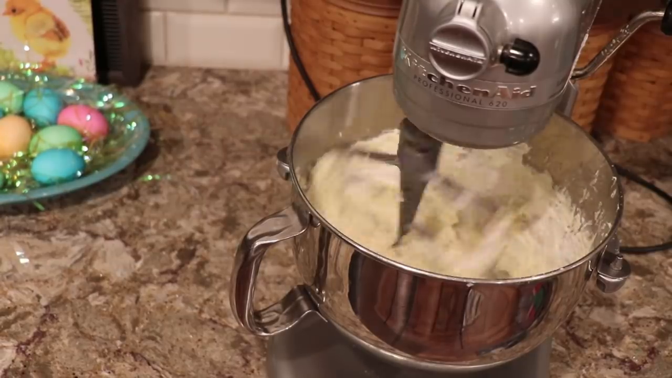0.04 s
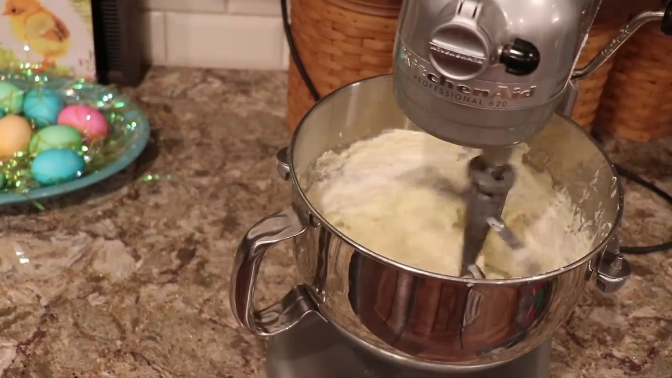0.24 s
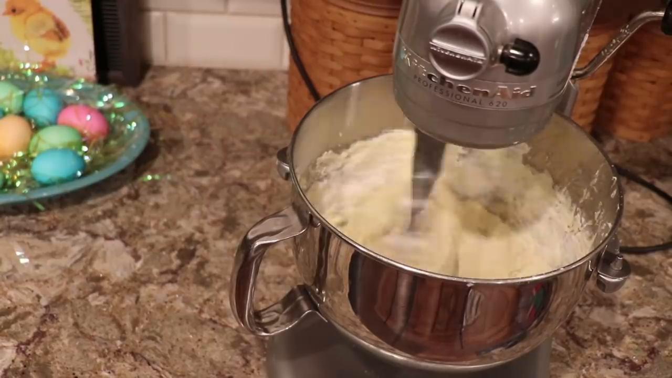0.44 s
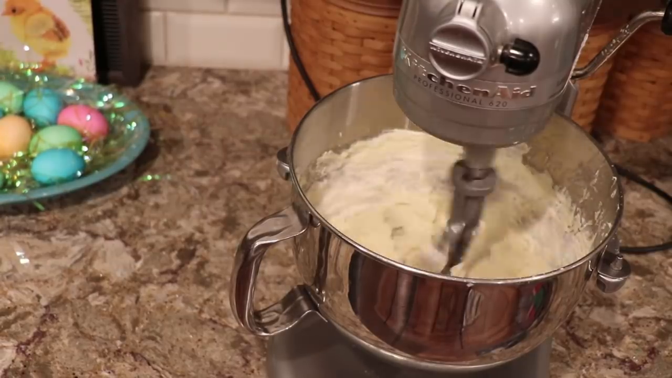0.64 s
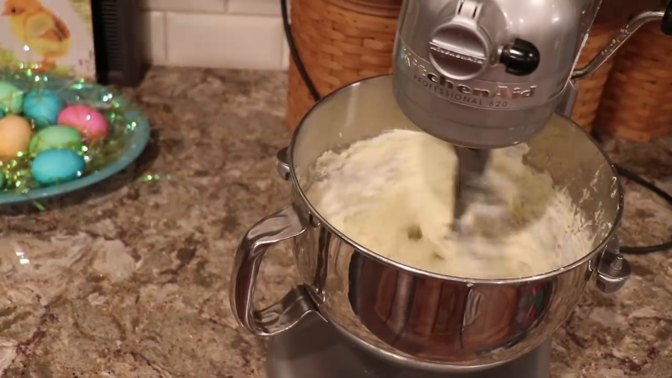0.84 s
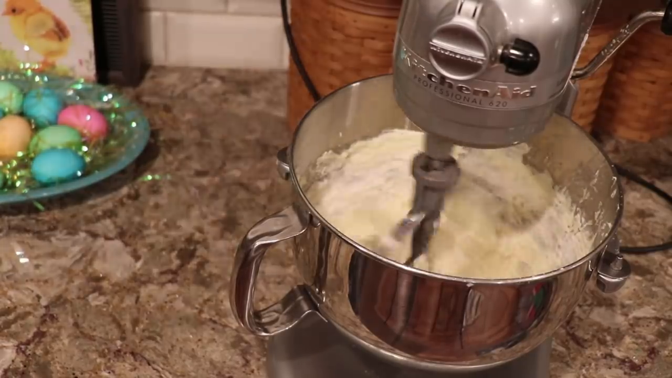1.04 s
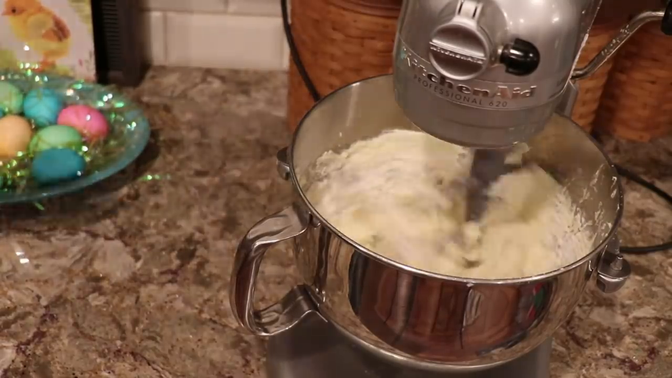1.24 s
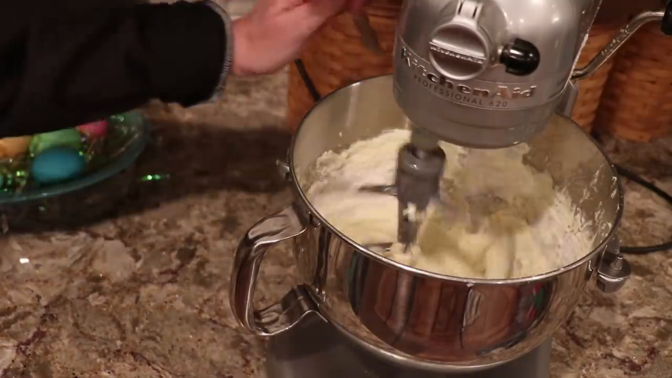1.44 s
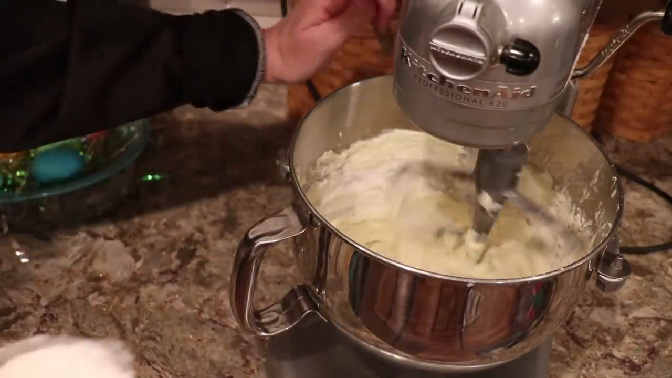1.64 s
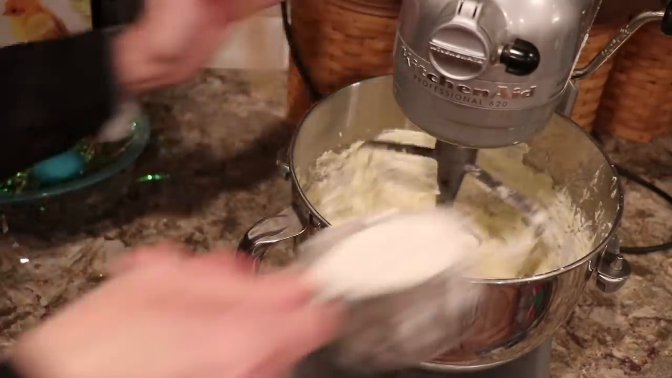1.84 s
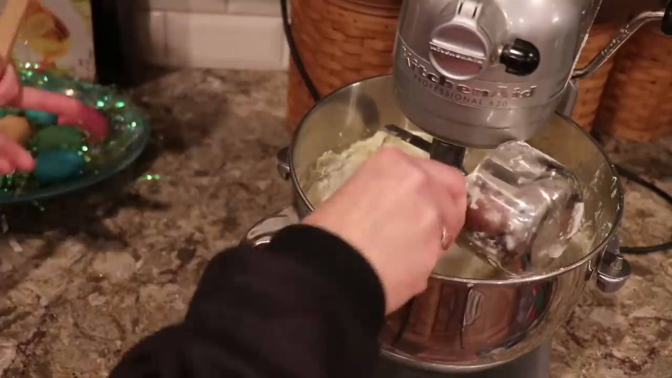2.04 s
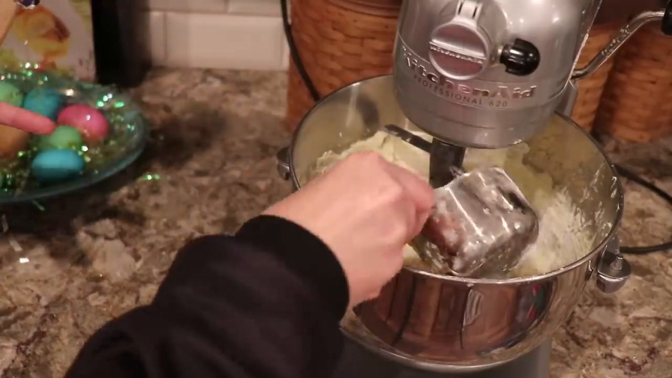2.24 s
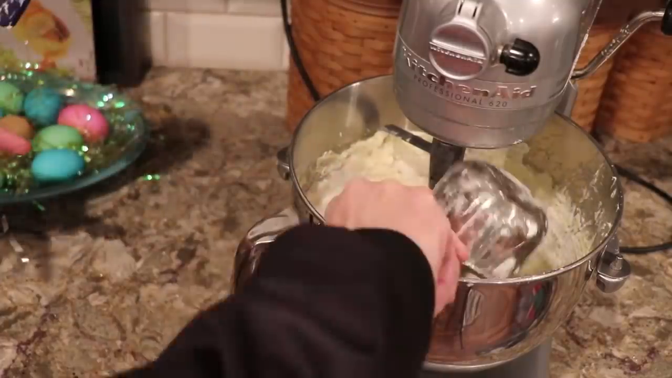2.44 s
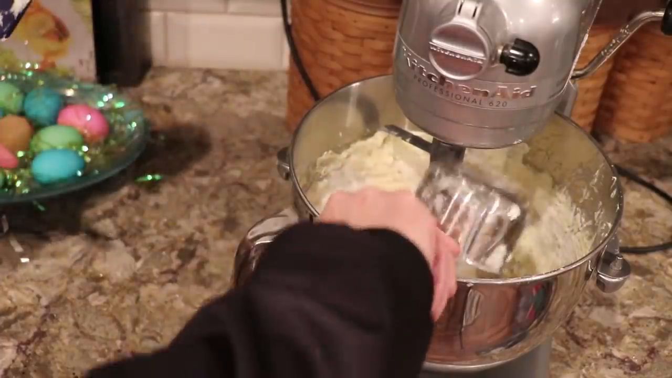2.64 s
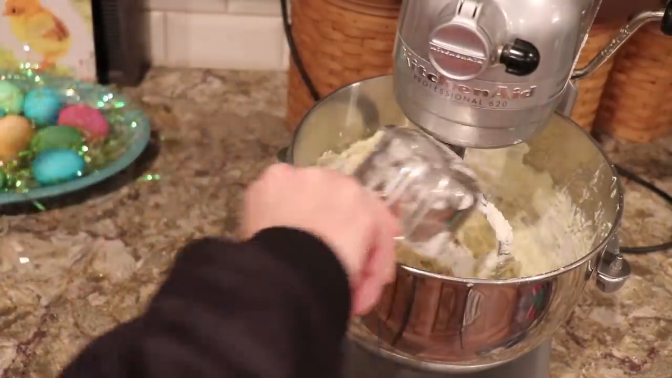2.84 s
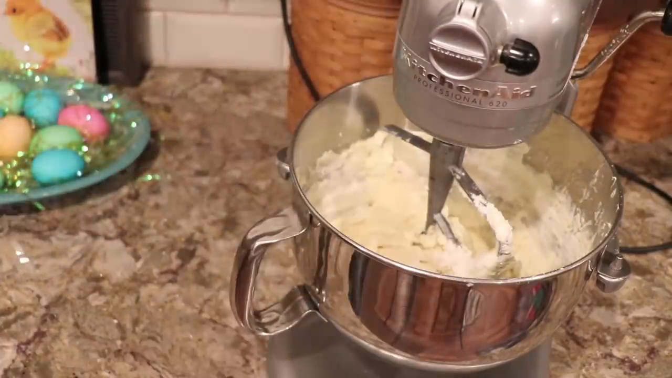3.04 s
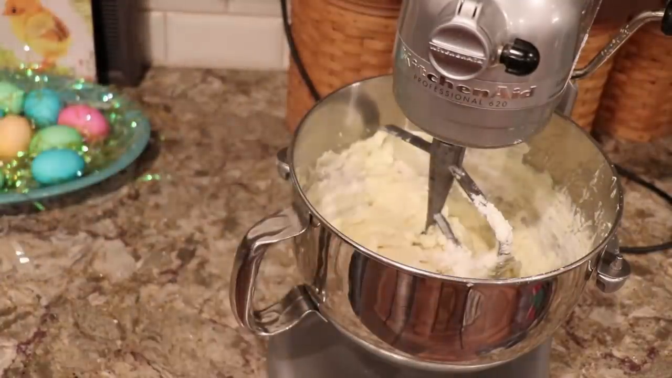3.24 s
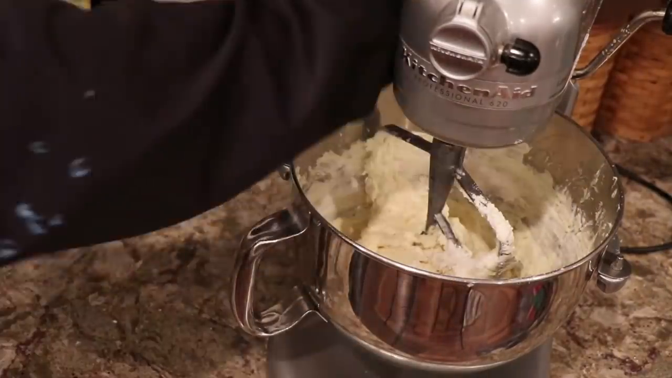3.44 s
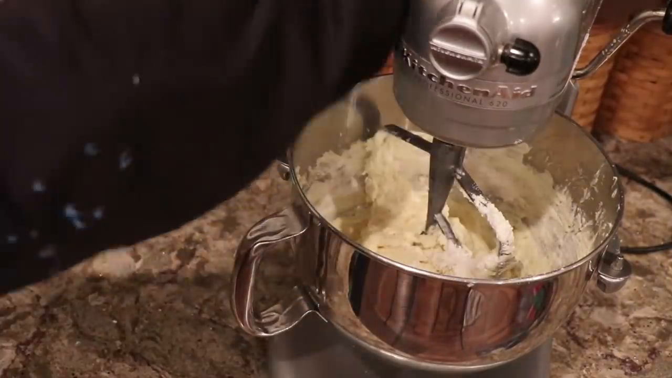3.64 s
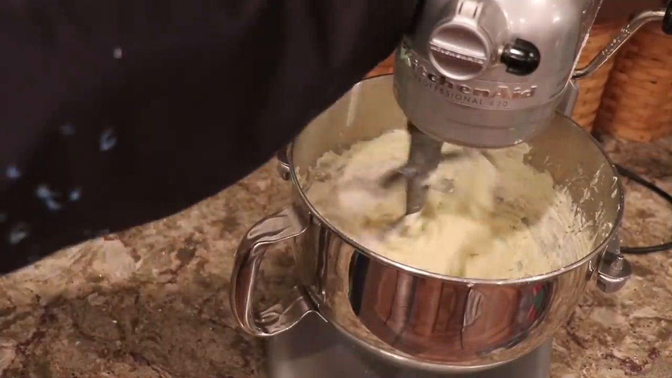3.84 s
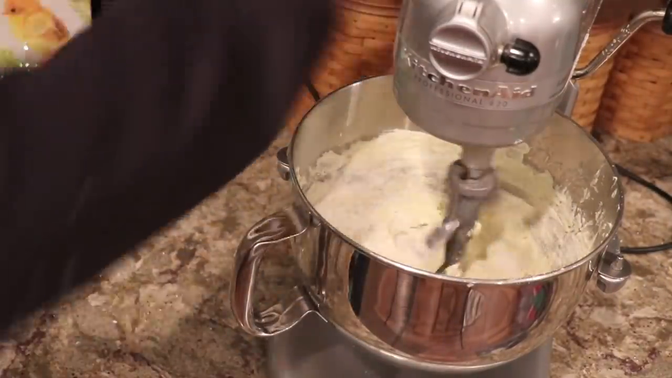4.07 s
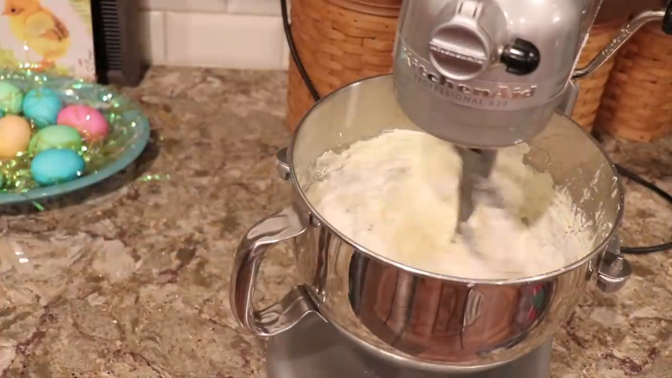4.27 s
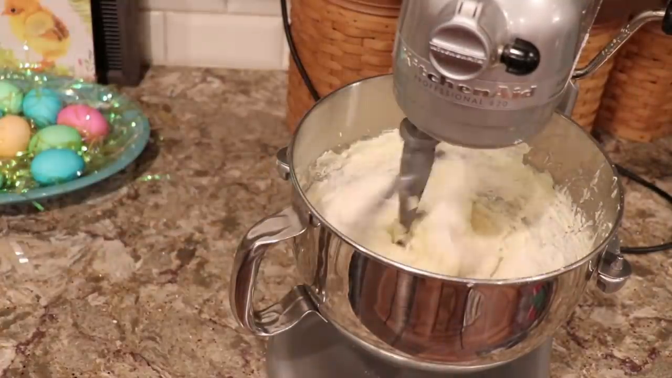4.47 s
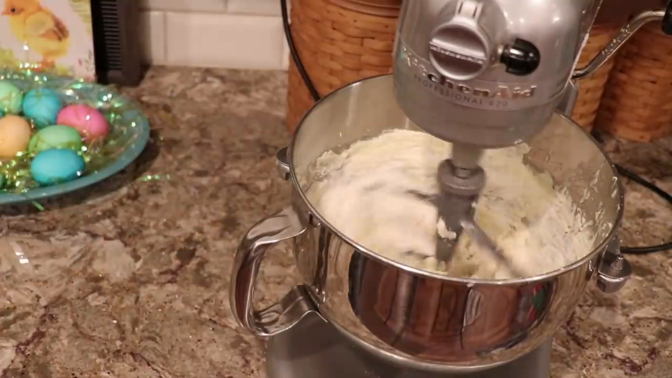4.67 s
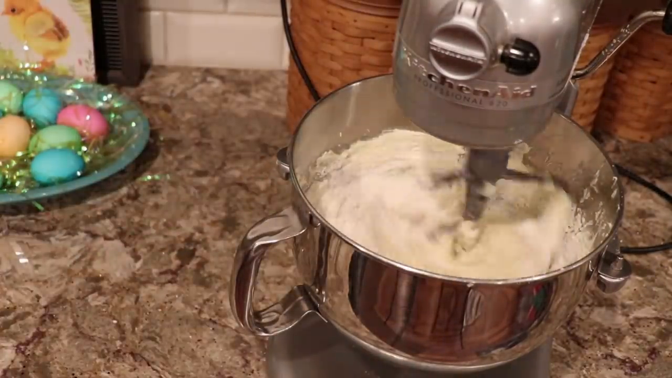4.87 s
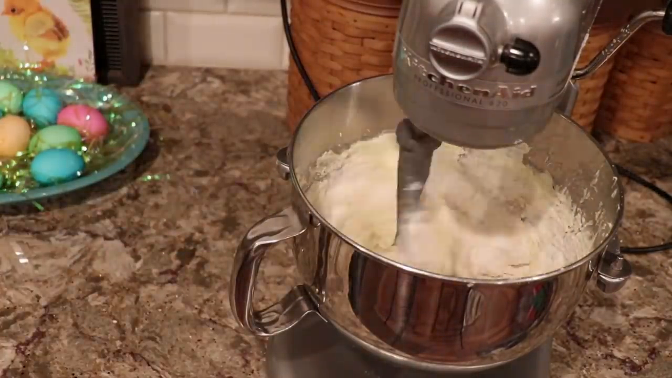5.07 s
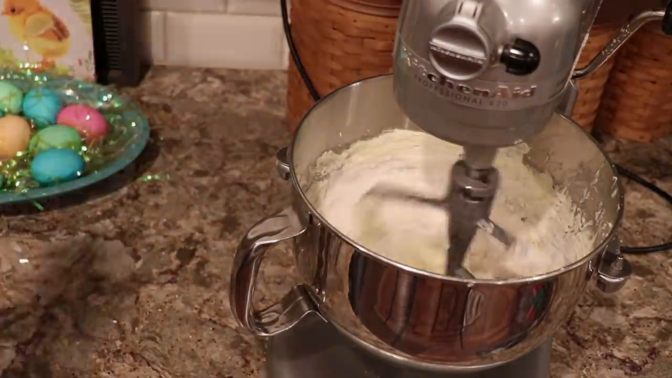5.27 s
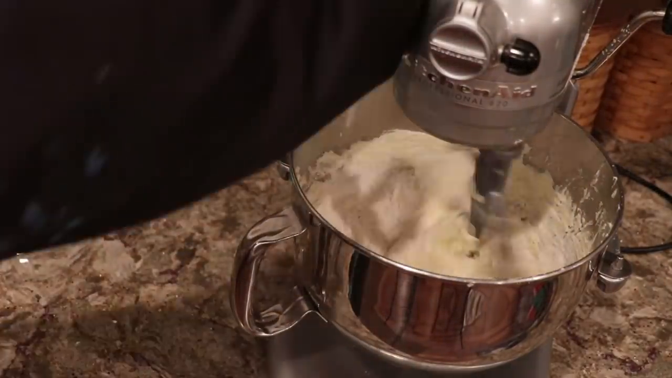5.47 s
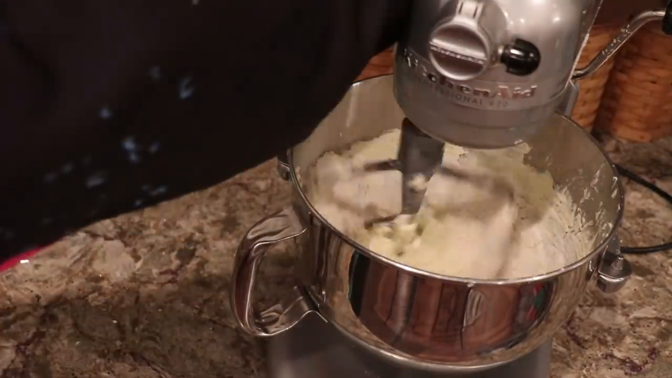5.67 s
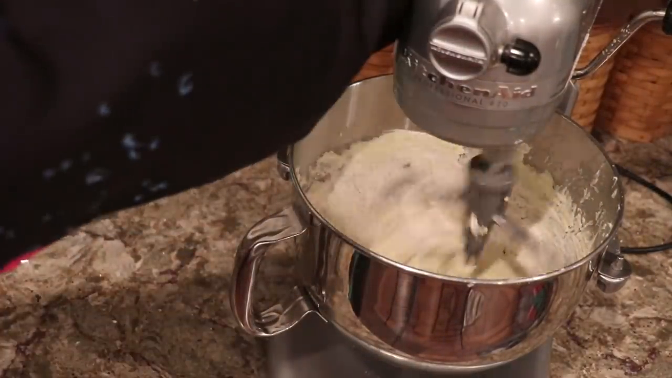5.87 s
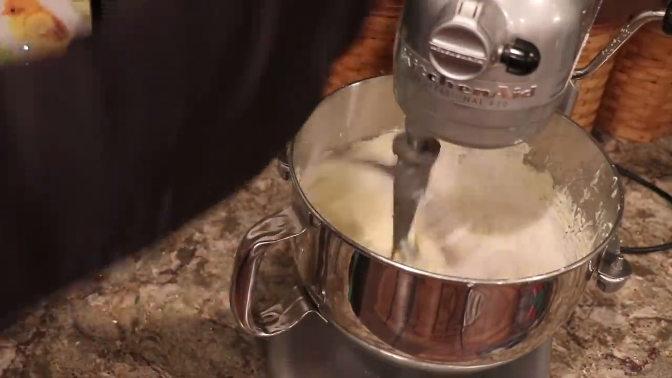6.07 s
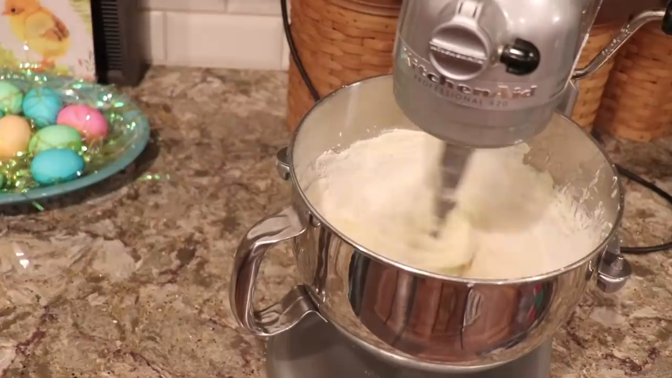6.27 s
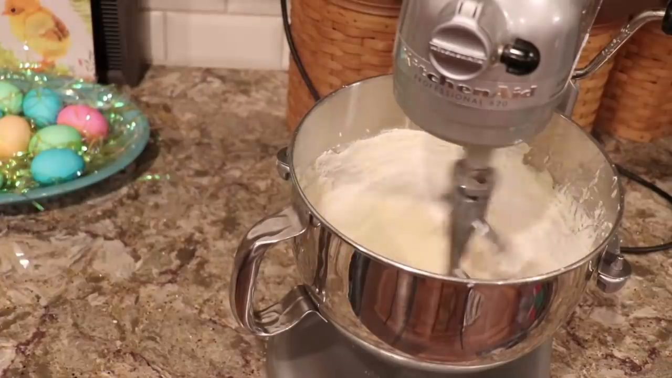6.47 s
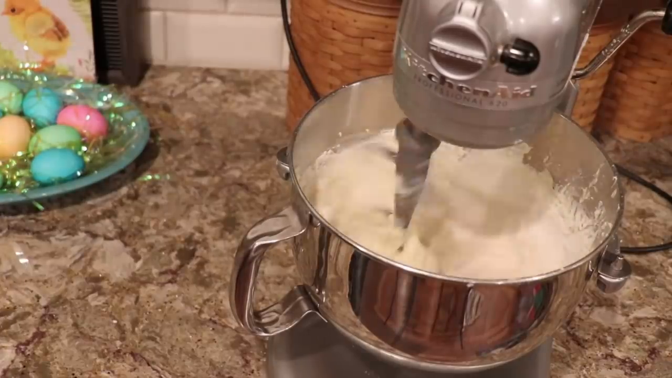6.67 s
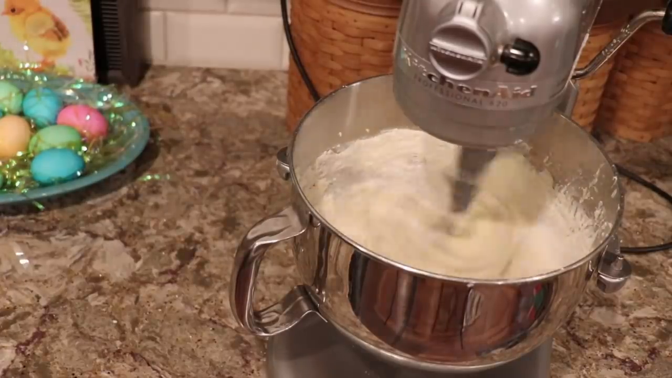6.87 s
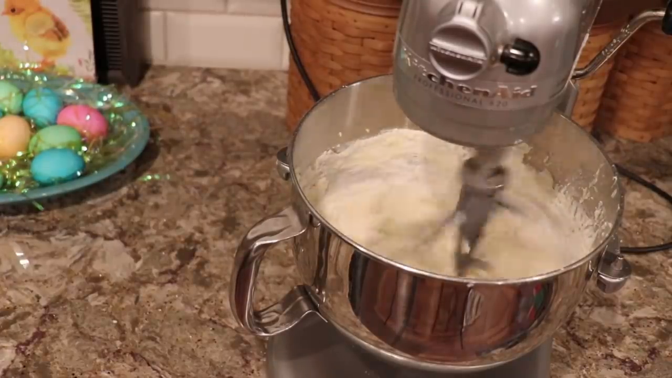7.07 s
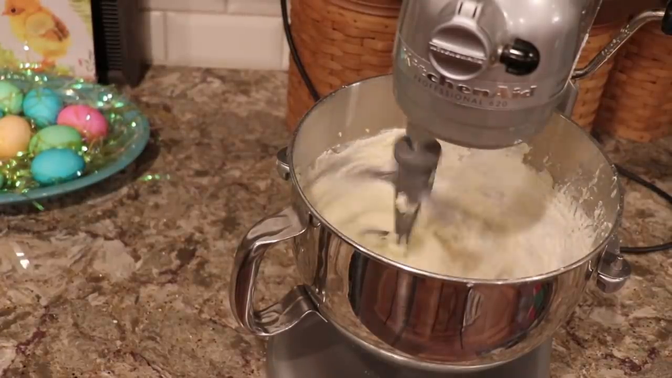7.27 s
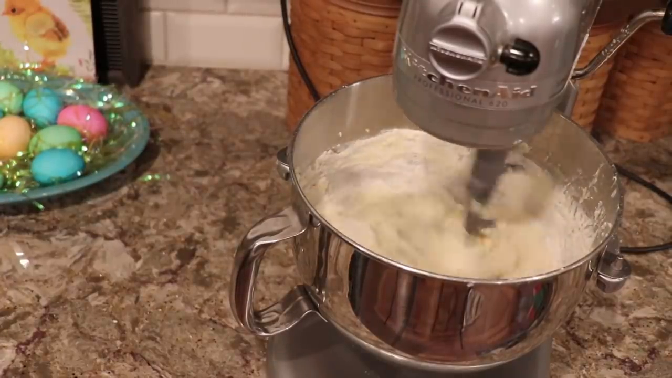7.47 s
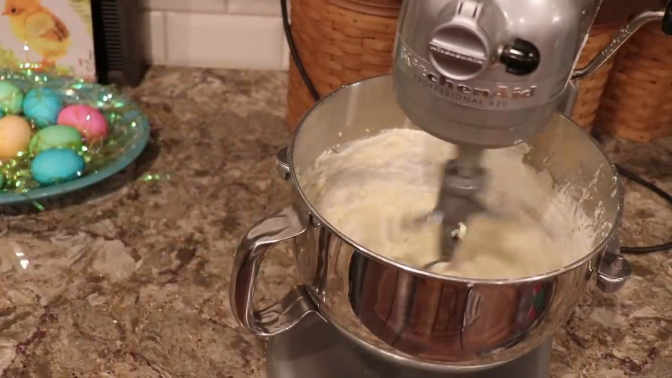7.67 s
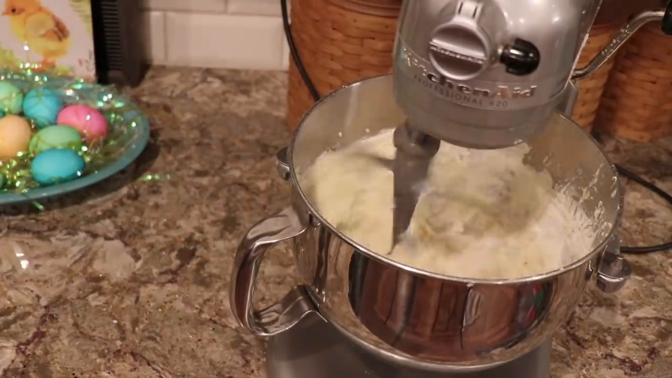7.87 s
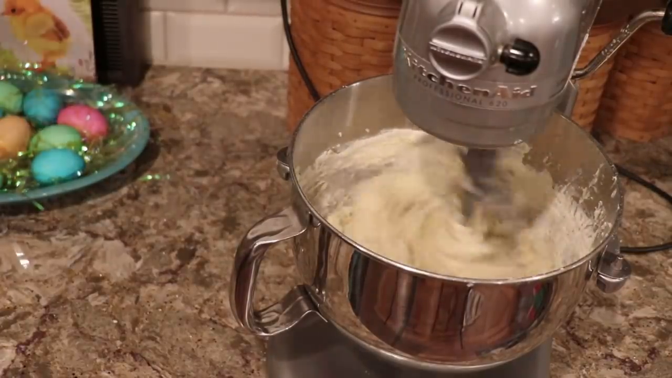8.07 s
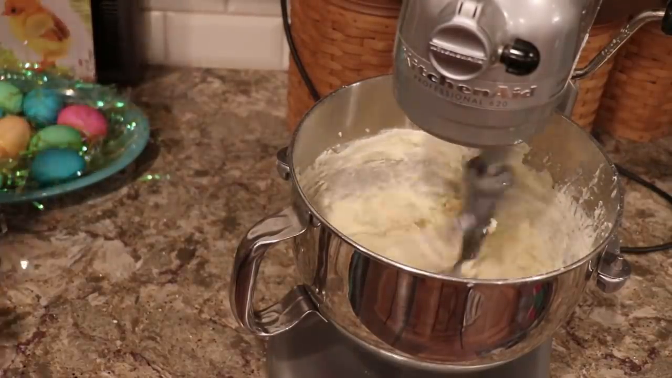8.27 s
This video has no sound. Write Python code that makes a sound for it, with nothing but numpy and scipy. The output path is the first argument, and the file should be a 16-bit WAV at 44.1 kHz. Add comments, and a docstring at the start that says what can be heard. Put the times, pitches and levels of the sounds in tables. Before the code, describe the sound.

From 0 to 1.7 seconds a stand mixer runs at medium speed, a steady nasal gear whine over grainy metallic housing rattle, throbbing rapidly with each turn. Switched off at 1.7, it slides down in pitch and dulls, stopping by about 2.0. Over faint hum and kitchen air, a metal cup knocks the steel bowl at 2.02, 2.08 and twice around 2.23, with soft scrapes, faint ticks near 2.55 and another bright tap at 2.83. At 3.28 the cup lands on the counter with a clack, low thud and short, thin high ring. Tiny switch-side ticks come at 3.56. At 3.77 the motor restarts with a gear jolt and strained buzz, settling into a lower, slower whine. At 5.82 it is turned up, leaping within about a tenth of a second with a clunk to a higher, brighter, busy whir that holds to 8.4. Close stereo, short room reflections.

```python
"""A stand mixer whirs at middle speed on a stone counter, is switched off and coasts down.
A metal cup knocks on the steel bowl and is set down; the mixer restarts slowly, then is turned up.
Gear teeth and motor poles sing at multiples of the shaft speed over noise from the rattling housing.
Blows are noise bursts passed through metal modes; thuds and slides are shaped bands of noise.
A controller buzz that rises and falls with effort, a faint hum, kitchen air and a short room join them."""
import sys
import numpy as np
from scipy import signal
from scipy.fft import rfft, irfft, next_fast_len
from scipy.io import wavfile
from scipy.ndimage import uniform_filter1d

SR = 44100
rng = np.random.default_rng(int(sys.argv[2]) if len(sys.argv) > 2 else 0)


def convert_level_to_amplitude(level_db):
    """Map a level in decibels to its linear amplitude factor."""
    exponent = np.asarray(level_db, float) / 20
    return 10 ** exponent


def dump(signal):
    """Clip the signal to [-1, 1] and save it as 16-bit WAV at the path in sys.argv[1]."""
    limited = np.clip(np.atleast_2d(signal).T, -1, 1)
    pcm = np.round(limited * 32767).astype(np.int16)
    wavfile.write(sys.argv[1], SR, pcm)


N = 366458
TIME = np.arange(N) / SR  # seconds


def evened(x):
    """Normalisation: scales a signal to unit rms."""
    return x / np.sqrt(np.mean(abs(x) ** 2) + 1e-20)


def read(points, hz):
    """Interpolation on a logarithmic frequency axis."""
    table_hz, value = np.transpose(points)
    return np.interp(np.log(hz + 1), np.log(table_hz + 1), value)


def coloured(x, db_of):
    """Zero-phase filtering: weights the spectrum by a level in dB given as a function of frequency."""
    length = x.shape[-1]
    size = next_fast_len(length)
    gain = convert_level_to_amplitude(db_of(np.fft.rfftfreq(size, 1 / SR)))
    return irfft(rfft(x, size) * gain, size)[..., :length]


def drift(width_hz):
    """Narrow-band random modulation: complex noise of unit rms through two equal low-pass poles."""
    hop = 64  # samples between computed points
    steps = np.arange(N // hop + 2)
    noise = rng.standard_normal((len(steps), 2)) @ [1, 1j]
    pole = np.exp(-np.pi * width_hz * hop / SR)
    wander = signal.lfilter([1], np.convolve([1, -pole], [1, -pole]), noise)
    return np.interp(np.arange(N) / hop, steps, evened(wander))


def add(mix, start_s, sound):
    """Superposition: adds a sound to the mix from its starting time."""
    part = mix[round(start_s * SR):][:len(sound)]
    part += sound[:len(part)]


# Shaft speed at the low, middle and high setting [turns per second].
SHAFT_SPEEDS = [15.94, 21.63, 32.03]
# Stages of the shaft speed: lever moves, then a last trim by the speed controller.
# Each row: start in seconds, speed asked for in turns per second (0 is off, and the shaft coasts),
# time constant of the approach in seconds.
SPEED_STAGES = [(1.69, 0, .335), (3.766, 15.96, .083), (5.82, 21.9, .013), (5.903, 31.4, .014),
                (5.95, 32.03, .045)]


def setting_of(speed):
    """Interpolation: places a shaft speed on the scale 0 low, 1 middle, 2 high."""
    return np.interp(speed, SHAFT_SPEEDS, [0, 1, 2])


def shaft():
    """Rotational inertia: the shaft lags each stage of the speed; gives speed and the speed asked for."""
    friction = 8  # dry friction drags the coasting shaft as if toward this many turns a second backwards
    asked = speed = np.full(N, SHAFT_SPEEDS[1])
    for start, turns, takes in SPEED_STAGES:
        since = np.maximum(TIME - start, 0) / takes
        left = np.exp(-since ** 2) if turns else np.exp(-since)
        goal = turns or -friction
        moved = np.maximum(goal + (speed[round(start * SR)] - goal) * left, 0)
        speed = np.where(TIME < start, speed, moved)
        asked = np.where(TIME < start, asked, turns)
    return speed, asked


# Base level of the rattle at the low, middle and high setting [dB, before a common 3.5 dB cut].
RATTLE_LEVELS = [-33.5, -31, -30]
# The main mesh is lost at slow speed. Each row: shaft speed in turns per second, level change in dB.
MESH_LEVELS = [(2, -70), (8, -44), (12.6, -29), (13.7, -0.5)]


def drive(speed, asked):
    """Load-dependent excitation: rattle, tone and mesh levels in dB, and the controller's effort."""
    coast_power = 1.37  # while coasting, rattle falls with this power of speed below the low setting
    slip_db, unload_db, fade_db_per_s = -60, -11, -130  # tones sink under lag and once power is cut
    backlash_db = 5.5  # unloaded teeth of the main mesh sing louder
    surge_db, surge_s = 15, 0.016  # tones flare on reaching top speed, then die by this time constant
    build_db, build_s = -1, 1  # at top speed the mixer starts softer and builds
    strain_per_lag, strain_s, eased = 6.8, 0.019, 0.54  # eased: effort at top speed

    powered = uniform_filter1d(1. * (asked > 0), size=400)
    lag = np.clip(1 - speed / np.maximum(asked, 1), 0, 1) * powered
    setting = setting_of(speed)
    since_off = TIME - SPEED_STAGES[0][0]
    top_start, _, top_takes = SPEED_STAGES[-2]
    since_top = TIME - top_start - 1.5 * top_takes
    flare, build = (uniform_filter1d((since_top > 0) * np.exp(-abs(since_top) / s), size=500)
                    for s in (surge_s, build_s))

    slow_db = 20 * np.log10(np.clip(speed / SHAFT_SPEEDS[0], .01, 1))
    rattle_db = np.interp(setting, [0, 1, 2], RATTLE_LEVELS) + (1 - powered) * coast_power * slow_db
    rattle_db = rattle_db + build_db * (build - flare)
    top_db = surge_db * flare + build_db * build
    cut_db = (1 - powered) * (unload_db + fade_db_per_s * since_off)
    tones_db = np.maximum(uniform_filter1d(slip_db * lag + cut_db, size=300), -50) + top_db
    mesh_db = np.interp(speed, *np.transpose(MESH_LEVELS)) + (1 - powered) * backlash_db + top_db

    pole = np.exp(-1 / (strain_s * SR))
    strain = np.minimum(strain_per_lag * signal.lfilter([1 - pole], [1, -pole], lag), 1)
    effort = powered * (np.interp(setting, [1, 2], [1, eased]) + strain)
    return rattle_db, tones_db, mesh_db, effort


# Multiples of the shaft speed that sing: gear meshes near 15 and 60, motor slots at 72 [orders].
SINGING_ORDERS = [24.7, 30.75, 40.1, 46.2, 50.85, 53, 60, 61.3, 66, 72, 75.3, 78, 84.6, 90.55, 105.4, 117.2,
                  121.3, 135.3, 144, 150.3, 166, 180.5, 204, 216, 237, 239, 287.5, 301, 360, 419.5, 431.5,
                  503.5, 576, 606, 650, 666, 720]
# Strength of each order above. Each row: rms level in dB at the low, middle and high setting before
# drive and throb, smeared share from 0 to 1.
ORDER_LEVELS = [(-75, -89, -58.5, 0.26), (-77, -62.5, -44, 0.04), (-67, -82, -58.5, 0.3),
                (-72, -48, -58.5, 0), (-66, -85, -68.5, 0.1), (-55, -72, -78, 0.03),
                (-40, -41.5, -39, 0.12), (-81, -71, -44.5, 0.9), (-78, -61, -83, 1),
                (-47.5, -65, -61, 0.24), (-78, -51, -40.5, 0.37), (-91, -52, -40, 0.7),
                (-92, -53, -58, 0.5), (-71, -62, -38.5, 0.19), (-58.5, -51, -44, 0.76),
                (-53, -46, -56, 0.2), (-52, -43.5, -53, 1), (-57.5, -50, -47, 0.65), (-83, -68, -55, 1),
                (-89, -62, -51.5, 1), (-86, -72, -65, 0.96), (-48, -55, -46, 0.4), (-72, -63, -72, 0.9),
                (-64, -55, -53.5, 0.87), (-58, -54, -90, 0.72), (-75, -51.5, -55.5, 0.65),
                (-75, -64, -50.5, 0.2), (-52.5, -51.5, -68, 0.92), (-53, -48, -56, 0.26),
                (-73, -53, -61, 0.6), (-79, -45.5, -59, 0.16), (-58, -52, -89, 0.4), (-58, -67, -80, 0),
                (-58, -61, -80, 0.2), (-55, -49, -78, 0.95), (-57.5, -51, -80, 0.1), (-60, -48, -90, 0.8)]


def gear_tones(setting, turn, wobble, tones_db, mesh_db):
    """Order tones: teeth and poles passing at fixed multiples of the shaft angle radiate lines."""
    mesh = 60  # teeth met per turn in the main mesh
    # the next gear turns a third as fast
    sway = np.interp(setting, [0, 1, 2], [.003, .003, .005]) * np.sin(turn / 3)
    tones = np.zeros(N)
    for order, (*levels, smeared) in zip(SINGING_ORDERS, ORDER_LEVELS):
        db = np.interp(setting, [0, 1, 2], levels) + (mesh_db if order == mesh else tones_db)
        if order == mesh:  # its teeth chatter at top speed
            smeared = np.interp(setting, [1, 2], [smeared, .7])
        # uneven teeth smear the line
        teeth = np.sqrt(1 - smeared) + np.sqrt(smeared) * drift(12 + 0.21 * order)
        angle = order * (turn + sway) + 2 * np.pi * rng.random()
        throb = 1 + wobble * np.clip(order / 30 - 1, .15, 1) * np.cos(turn)  # low orders hardly throb
        tones += np.sqrt(2) * convert_level_to_amplitude(db) * throb * (teeth * np.exp(1j * angle)).real
    return tones


# Relative rattle spectra, one list each for the low, middle and high setting.
# Each row: frequency in Hz, density in dB per Hz.
RATTLE_SPECTRA = [
    [(59, -78), (100, -42.5), (744, -19.5), (959, -3), (1180, -11.5), (1370, -19.5), (1890, -13),
     (2880, -6.5), (3200, -15.5), (5200, -16), (5900, -9.5), (6420, -14), (15600, -24)],
    [(59, -73), (100, -40), (542, -29), (590, -20), (1290, -4.5), (1530, -18), (2590, -4), (3550, -14.5),
     (7770, -12), (8630, -25), (9390, -14), (11600, -18), (15600, -27)],
    [(59, -63), (100, -35.5), (542, -28.5), (980, -12.5), (1370, -21.5), (1890, -5.5), (2880, -5.5),
     (3130, -6), (3340, -7.5), (5090, -12.5), (5900, -7.5), (8450, -18.5), (15600, -21.5)],
]
# Resonances of the cast housing. Each row: frequency in Hz, width in Hz, gain at the centre in dB
# before neighbouring resonances add.
HOUSING_MODES = [(804, 30, 6), (1020, 810, 5), (1277, 32, 7.5), (1670, 120, 9), (1850, 46, 8.5),
                 (1948, 83, 9), (2167, 100, 7), (2603, 170, 6.5), (2610, 56, 0.5), (2922, 61, 11),
                 (3360, 95, 12), (3713, 95, 9), (3936, 210, 10), (4337, 167, 11.5), (5440, 100, 2),
                 (5894, 206, 9.5), (7034, 37, 5.5), (8300, 110, 17), (9740, 470, 9), (10840, 750, 5),
                 (12350, 680, 10), (13620, 320, 17.5), (14960, 1230, 12), (16100, 300, -2)]


def housing_rattle(speed, setting, turn, wobble, rattle_db):
    """Forced vibration: irregular noise excites the resonant housing, heard from two of its faces."""
    shake = rng.standard_normal((2, N)) * convert_level_to_amplitude(1.38 * rng.exponential(1, N))
    shake *= 1 + 0.085 * wobble * np.cos(turn)
    shake *= 1 + 0.18 * np.cos(12 * turn)  # twelve poles
    shake *= convert_level_to_amplitude(0.64 * drift(3.4).real)

    def housing_db(hz):
        peaks = sum((convert_level_to_amplitude(db) - 1) / (1 + (2 * (hz - f) / width) ** 2) for f, width, db in HOUSING_MODES)
        return 20 * np.log10(1 + peaks.clip(-.9))

    shake = coloured(shake, housing_db)
    rattle = 0
    for k, points in enumerate(RATTLE_SPECTRA):
        share = np.sqrt(np.clip(1 - abs(setting - k), 0, 1))  # crossfade between settings
        rattle = rattle + share * evened(coloured(shake, lambda hz: read(points, hz)))
    slowing = np.clip(speed / SHAFT_SPEEDS[0], 0, 1)  # treble dies first as the shaft slows
    dull = coloured(rattle, lambda hz: -9.0 * np.log2(1 + hz / 1800))
    return convert_level_to_amplitude(rattle_db - 3.5) * (slowing ** 1.3 * rattle + (1 - slowing) * 3.1 * dull)


# Buzz of the speed controller. Each row: frequency in Hz, rms level in dB of the powered part at unit
# effort, rms level in dB of the part left at rest, power of the effort that the powered part follows.
BUZZ_LINES = [(360, -77.5, -86, 0.65), (502, -89, -76.5, 1.3), (510, -78, -97, 2.3), (600.4, -66, -64.5, 3),
              (900, -55.5, -62, 1.8), (1200, -50, -65.5, 0.3)]


def controller_buzz(effort):
    """Phase modulation: fixed-frequency lines grow with effort and roughen under strain."""
    roughness = 0.067 + 1.2 * np.clip(effort - 1.2, 0, 1)  # radians per unit of drift
    buzz = np.zeros(N)
    for hz, on_db, rest_db, power in BUZZ_LINES:
        level = convert_level_to_amplitude(rest_db) + effort ** power * convert_level_to_amplitude(on_db)
        buzz += level * np.sin(2 * np.pi * hz * TIME + roughness * drift(25).real)
    return np.sqrt(2) * buzz


def mixer():
    """Common excitation: one shaft drives tones, rattle and buzz; gives the near and far faces."""
    speed, asked = shaft()
    rattle_db, tones_db, mesh_db, effort = drive(speed, asked)
    turning = np.interp(TIME, [2.0, 2.01, 3.76, 3.766], [1, 0, 0, 1])  # silences tones and rattle at rest
    speed = speed * (1 + 0.001404 * drift(7.04).real)  # the dough loads the beater unevenly
    setting = setting_of(speed)
    turn = 2 * np.pi * np.cumsum(speed) / SR  # shaft angle in radians
    wobble = np.interp(setting, [0, 1, 2], [.25, .45, .4])  # an off-centre gear throbs once a turn
    tones = gear_tones(setting, turn, wobble, tones_db, mesh_db)
    near_face, far_face = turning * housing_rattle(speed, setting, turn, wobble, rattle_db)
    buzz = controller_buzz(np.maximum(effort, 0) * turning)
    return turning * tones + near_face + buzz, far_face


def hum():
    """Amplitude modulation: a steady 300 Hz sine whose rms level in dB comes and goes."""
    db = np.interp(TIME, [.35, .65, 5.67, 6.67], [-75, -70.5, -70.5, -93])
    return np.sqrt(2) * convert_level_to_amplitude(db) * np.sin(2 * np.pi * 300 * TIME)


# Relative spectrum of the kitchen air. Each row: frequency in Hz, density in dB per Hz.
KITCHEN_SPECTRUM = [(25, -50), (70, -24), (110, -16), (200, -27), (400, -10.5), (600, -5.5), (1000, 3.5),
                    (1400, -3.5), (2150, -7.5), (3000, -12.5), (6000, -23.5), (10000, -33.5), (12500, -30),
                    (15800, -33)]


def kitchen_air():
    """Coloured noise: two independent channels share a small flicker in level."""
    air = coloured(rng.standard_normal((2, N)), lambda hz: read(KITCHEN_SPECTRUM, hz))
    return convert_level_to_amplitude(-54) * evened(air) * convert_level_to_amplitude(drift(36).real)


# Reverberation of the room. Each row: frequency in Hz, 60 dB decay time in seconds.
ROOM_DECAY = [(300, 0.14), (1000, 0.17), (3000, 0.18), (8000, 0.11), (15000, 0.32)]


def room_tails():
    """Frequency-dependent reverberation: two tails of sparse random taps, bands dying at own rates."""
    taps = np.zeros((2, SR // 2))
    starts = np.arange(100, SR // 2 - 20, 20)
    at = starts + rng.integers(0, 20, (2, (SR // 2 - 101) // 20))
    np.put_along_axis(taps, at, rng.choice([-1., 1.], at.shape), 1)
    hz, t, spectrum = signal.stft(taps, SR, nperseg=256)
    decay = convert_level_to_amplitude(-60 * t / read(ROOM_DECAY, hz)[:, None])
    tails = signal.istft(spectrum * decay, SR, nperseg=256)[1]
    return tails / np.linalg.norm(tails, axis=1)[:, None]


def bandpassed(x, order, hz):
    """Causal band-pass filtering by a Butterworth network."""
    return signal.sosfilt(signal.butter(order, hz, "band", fs=SR, output="sos"), x)


def metal_colour(x, crack_db, top_db):
    """Band splitting into body, crack and top: thin metal radiates no bass."""
    bands = ([720, 1500], 0), ([1500, 4800], crack_db), ([4800, 12000], top_db)
    return sum(convert_level_to_amplitude(db) * bandpassed(x, 3, hz) for hz, db in bands)


def blow(modes, peak_db, crack_db, top_db, ring, t60):
    """Modal excitation: a crack and clatter dying in t60 s pass, by the ring share, through metal modes."""
    t = np.arange(SR // 2) / SR
    clatter = rng.standard_normal(len(t)) * (np.exp(-t / 0.0018) + 0.14 * convert_level_to_amplitude(-60 * t / t60))
    clatter[:3] -= 1.5  # first contact
    body = sum(convert_level_to_amplitude(db - 60 * t / decay) * np.sin(2 * np.pi * hz * t) for hz, db, decay in modes)
    rung = signal.fftconvolve(clatter, body / np.linalg.norm(body))[:len(t)]
    sound = metal_colour((1 - ring) * clatter + ring * rung, crack_db, top_db)
    return convert_level_to_amplitude(peak_db) * sound / abs(sound).max()


def blows(modes, rows, ring, t60):
    """Superposition of separate blows on one set of modes."""
    out = np.zeros(N)
    for start, *strength in rows:
        add(out, start, blow(modes, *strength, ring, t60))
    return out


# Knocks of the cup on the bowl, then two faint ticks near the hand at the switch.
# Each row: start in seconds, peak level in dB, crack and top gains in dB about the body.
KNOCKS_AND_TICKS = [(2.0159, -20, -12.5, -48), (2.0762, -10, 1.5, -19.5), (2.179, -34, -3, -30),
                    (2.192, -31.5, -10, -33), (2.2245, -18.5, 1, -30), (2.241, -10.5, 6, -16),
                    (2.505, -38, -17, -30), (2.547, -41.5, -16, -30), (2.599, -34, -20, -32),
                    (2.825, -16.5, 7, -10), (3.556, -40, 2, 0), (3.57, -40, 4, -7)]
# Modes of the steel bowl. Each row: frequency in Hz, relative level in dB, 60 dB decay time in seconds.
BOWL_MODES = [(1030, 5, .055), (1900, -6, .02), (2430, -4, .03), (3200, -4, .02), (3900, -8, .03),
              (5100, -16, .03), (9440, -28, .2)]


def knocks_and_ticks():
    """Impact excitation: knocks on the bowl, and the later ticks, all pass through the bowl's modes."""
    return blows(BOWL_MODES, KNOCKS_AND_TICKS, ring=0.39, t60=0.071)


# Thuds through the counter. Each row: start in seconds, level in dB (9.5 dB below the peak),
# frequency in Hz, one third of the 60 dB decay time in seconds.
COUNTER_THUDS = [(2.03, -70, 110, 0.17), (2.241, -71, 150, 0.16), (2.62, -74, 100, .25),
                 (2.826, -54.5, 350, 0.038), (3.279, -55.5, 199, 0.084), (3.9, -74, 150, 0.089)]


def counter_thuds():
    """Structure-borne sound: the counter carries low pushes of decaying band-limited noise."""
    out = np.zeros(N)
    t = np.arange(SR // 3) / SR
    for start, db, hz, third_t60 in COUNTER_THUDS:
        envelope = convert_level_to_amplitude(-60 * t / (3 * third_t60)) * np.minimum(t / 0.0009, 1)
        low = bandpassed(rng.standard_normal(len(t)) * envelope, 2, [hz / 1.2, hz * 2.4])
        add(out, start, convert_level_to_amplitude(db + 9.5) * low / abs(low).max())
    return out


# Soft slides of the cup and of flour. Each row: start in seconds, rms level in dB,
# crack gain in dB about the body, length in seconds.
SOFT_SLIDES = [(2.088, -55, -10, 0.064), (2.14, -50, -11, 0.098), (2.246, -45, -10, 0.056),
               (2.339, -51.5, -2, 0.035), (2.394, -55.5, -5, 0.038), (2.838, -50, -7, 0.04),
               (3.1, -57.5, -15, 0.085), (3.289, -39, -21, 0.042), (3.442, -57, -5, 0.025),
               (3.462, -56, -8, 0.046), (3.601, -56.5, -13, 0.073)]


def soft_slides():
    """Friction noise: a short burst of coloured noise forms a soft grainy swell."""
    out = np.zeros(N)
    for start, db, crack_db, length in SOFT_SLIDES:
        size = round(length * SR)
        grit = rng.standard_normal(size) * signal.windows.tukey(size, .7)
        add(out, start, convert_level_to_amplitude(db) * evened(metal_colour(grit, crack_db, crack_db - 12.5)))
    return out


# Cup on counter. Each row: start in seconds, peak level in dB, crack and top gains in dB about the body.
CUP_LANDINGS = [(3.278, -17, 1.1, -3.5), (3.283, -11, 2.8, -25)]
# Modes of the cup. Each row: frequency in Hz, relative level in dB, 60 dB decay time in seconds.
CUP_MODES = [(790, -3, .03), (1100, -1, .03), (2630, -5, .025), (3200, -5, .02), (3950, -5, .05),
             (4860, -12, .25)]


def cup_set_down():
    """Impact excitation: landing on the counter rings the damped modes of the cup."""
    return blows(CUP_MODES, CUP_LANDINGS, ring=0.25, t60=0.23)


# The thin ring of the settling cup. Each row: frequency in Hz, rms level in dB before the swell.
CUP_RING = [(6056, -42), (7040, -64), (4860, -64)]


def cup_ring():
    """Free vibration: high partials swell as the cup settles, hold briefly and decay."""
    rise_s, hold_s, db_per_s = .015, .072, -190
    t = np.arange(SR // 2) / SR
    swell = (1 - np.exp(-t / rise_s)) * convert_level_to_amplitude(db_per_s * np.maximum(t - hold_s, 0))
    partials = sum(convert_level_to_amplitude(db) * np.sin(2 * np.pi * hz * t) for hz, db in CUP_RING)
    out = np.zeros(N)
    add(out, 3.299, np.sqrt(2) * swell * partials)
    return out


# Jolts of the gears. Each row: start in seconds, peak level in dB, crack and top gains in dB
# about the body.
GEAR_JOLTS = [(3.765, -37, 2, -3), (3.836, -28.5, 2, -20), (5.927, -23, 3.5, -20)]
# Modes of the gearbox. Each row: frequency in Hz, relative level in dB, 60 dB decay time in seconds.
GEARBOX_MODES = [(960, 0, 0.058), (2670, 3, 0.12), (3800, -1, .12)]


def gear_jolts():
    """Backlash impact: the gears jolt as the slack is taken up, ringing the gearbox."""
    return blows(GEARBOX_MODES, GEAR_JOLTS, ring=0.52, t60=.1)


# Colour of the side signal. Each row: frequency in Hz, gain in dB before a common 1.5 dB cut.
SIDE_COLOUR = [(100, -5), (600, -12.5), (1200, -2.5), (2500, -3), (5000, 1), (9000, 8), (11000, -13),
               (14000, 3)]


def scene():
    """Mid-side stereophony: direct sound and one tail in the mid, far face and another tail in the side."""
    motor, far_face = mixer()
    near = motor + hum() + knocks_and_ticks() + counter_thuds() + soft_slides()
    near += cup_set_down() + cup_ring() + gear_jolts()
    mid_tail, side_tail = signal.oaconvolve(near[None], room_tails(), axes=1)[:, :N]
    air = kitchen_air()
    mid = near + convert_level_to_amplitude(-8.0) * mid_tail + air[0]
    side = 0.49 * side_tail + 0.4 * far_face + air[1]
    side = coloured(side, lambda hz: read(SIDE_COLOUR, hz) - 1.5)
    return np.array([mid + side, mid - side])


def band_limit(x):
    """A steep low-pass at the top of the band."""
    return signal.sosfilt(signal.butter(12, 16960, fs=SR, output="sos"), x)


# Level of the left port against the right. Each row: frequency in Hz, difference in dB.
LEFT_OVER_RIGHT = [(200, -0.2), (1000, -0.4), (2500, -1.5), (5000, -3), (14000, -3.5)]


def record(dry):
    """Interchannel differences: the right port is nearer the treble and a sample earlier; then a band limit."""
    def limit_db(hz):
        return -80 * (hz > 15760)

    left = coloured(np.roll(dry[0], 1), lambda hz: read(LEFT_OVER_RIGHT, hz) / 2 + limit_db(hz))
    right = coloured(dry[1], lambda hz: -read(LEFT_OVER_RIGHT, hz) / 2 + limit_db(hz))
    return band_limit(np.array([left, right]))


dry = scene()
out = record(dry)
dump(out)
```